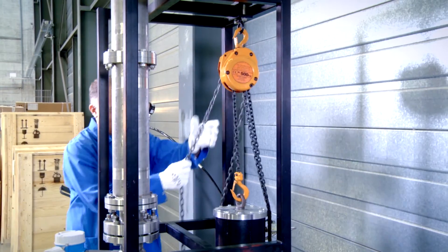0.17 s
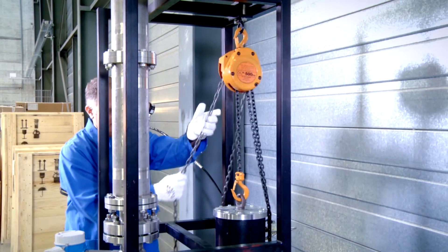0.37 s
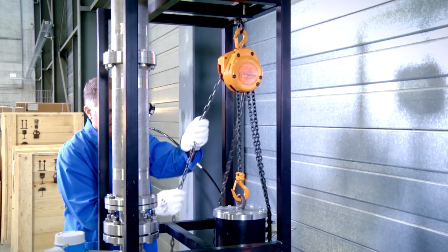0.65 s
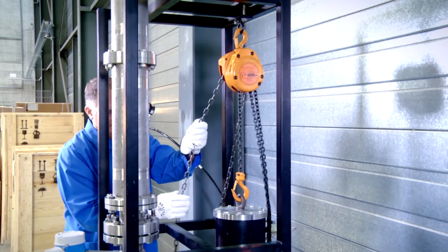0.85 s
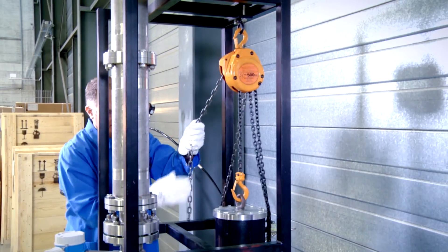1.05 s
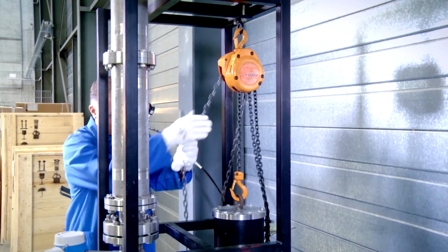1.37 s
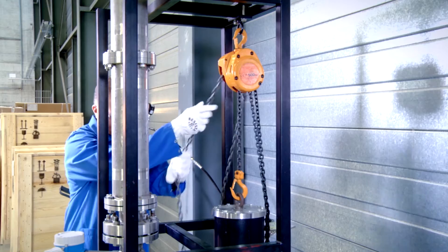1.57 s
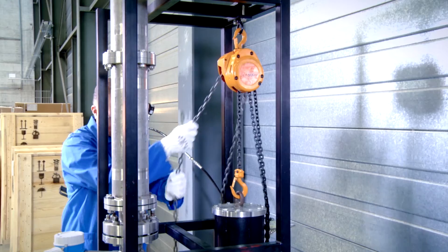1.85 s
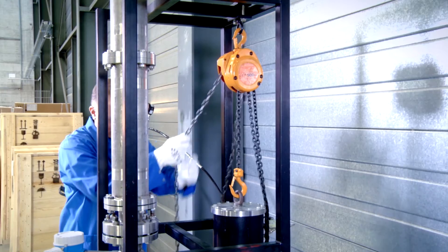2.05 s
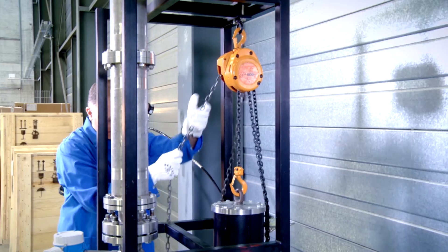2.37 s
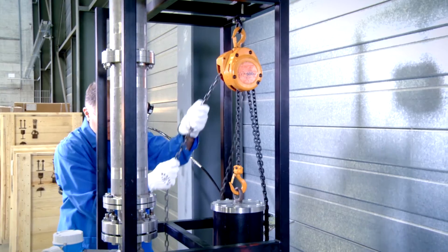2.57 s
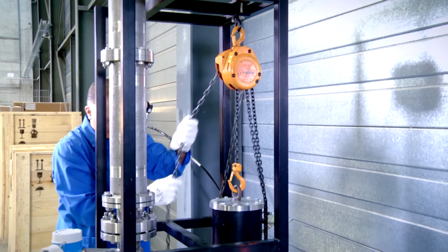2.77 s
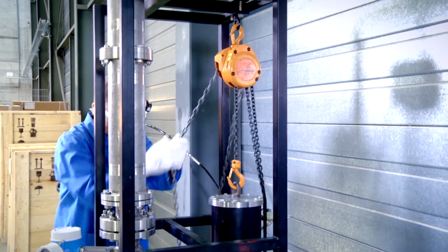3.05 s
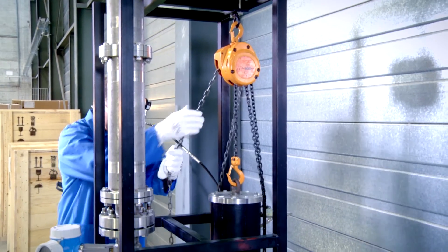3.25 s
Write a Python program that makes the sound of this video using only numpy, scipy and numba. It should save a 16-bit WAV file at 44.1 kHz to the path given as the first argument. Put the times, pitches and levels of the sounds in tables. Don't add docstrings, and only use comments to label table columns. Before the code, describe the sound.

A hand chain is pulled through a steel chain hoist. Until about 0.6 s, thin ticks run evenly, about 25 per second, over soft sliding links. A clunk lands near 0.7 s, then a brief lull. From 1.05 s, knock-and-clunk pairs follow every 0.15-0.2 s, with irregular ticks; after 1.8 s loose links jingle and a plate sings high. Rattling thickens near 2.8 s. Hall reverberation, faint ventilation hum.

```python
import sys
import numpy as np
from scipy import signal
from scipy.fft import rfft, irfft
from scipy.io import wavfile
from scipy.ndimage import uniform_filter1d
from numba import njit

SR = 44100
rng = np.random.default_rng(int(sys.argv[2]) if len(sys.argv) > 2 else 0)


def linear_from_db(decibels):
    return 10 ** (np.asarray(decibels, float) / 20)


def master(y):
    cut = np.clip(np.atleast_2d(y).T, -1, 1)
    pcm = np.round(cut * 32767)
    wavfile.write(sys.argv[1], SR, pcm.astype(np.int16))


N = 149940
LEAD = 17640
M = N + LEAD

# (time [s], peak level [dB])
SEATINGS = [(0.678, -22), (1.176, -20), (1.392, -17.5), (1.571, -16.5), (1.704, -18.5), (1.835, -20.5),
            (1.983, -19), (2.14, -18), (2.319, -22), (2.54, -23.5), (2.705, -18), (2.821, -17),
            (2.927, -26.5), (2.957, -19), (3.093, -18.5), (3.225, -20.5)]
# (time [s], peak level [dB])
SLIDES = [
    (-.16, -23.5),
    (0, -28.5),
    (.139, -30.5),
    (.148, -28.5),
    (.172, -35),
    (.298, -27.5),
    (.309, -26.5),
    (.337, -38),
    (.468, -24),
    (.48, -33),
]
# (time [s], peak level [dB])
EDGE_KNOCKS = [(0.1003, -37.5), (0.1176, -35.5), (0.2766, -43), (0.614, -37.5), (0.6425, -30.5),
               (0.6577, -34), (1.0483, -25), (1.1046, -48), (1.353, -25.5), (1.3608, -33), (1.438, -30.5),
               (1.5387, -24), (1.6705, -27.5), (1.8115, -22.5), (1.948, -22.5), (2.1076, -24),
               (2.27, -38.5), (2.277, -25.5), (2.49, -24.5), (2.6796, -23), (2.792, -28), (3.0668, -22),
               (3.192, -22), (3.3944, -25)]
# (time [s], peak level [dB])
EARLY_TICKS = [(0.013, -41.5), (0.057, -41.5), (0.097, -41.5), (0.139, -43), (0.1815, -44), (0.2176, -44),
               (0.2558, -42), (0.2927, -47), (0.3344, -40.5), (0.375, -48), (0.411, -45), (0.451, -43.5),
               (0.498, -43.5), (0.5472, -44.5), (0.605, -42.5), (0.6606, -40), (0.7334, -45.5),
               (0.7955, -46), (1.048, -42), (1.097, -41), (1.1772, -73), (1.2316, -43.5), (1.277, -42.5),
               (1.32, -42), (1.3544, -41), (1.3917, -37), (1.4451, -43), (1.4945, -41), (1.5394, -41),
               (1.5718, -38.5)]
LATE_TICKS = [(1.6102, -43), (1.6377, -43), (1.6713, -40.5), (1.703, -36), (1.7459, -42.5), (1.7735, -42),
              (2.04, -34), (2.1054, -36.5), (2.2034, -42.5), (2.2425, -43), (2.35, -45), (2.395, -42.5),
              (2.4368, -46), (2.4512, -43.5), (2.6035, -41), (2.681, -39), (2.917, -39), (3.039, -39.5),
              (3.073, -37), (3.1438, -40), (3.1944, -37), (3.2854, -46), (3.3324, -43), (3.3944, -32)]
# (time [s], peak level [dB])
LINK_STRIKES = [(0.2972, -38.5), (0.3374, -41), (0.3992, -42), (0.613, -41.5), (0.658, -38), (1.3542, -40),
                (1.3915, -49), (1.8085, -29), (1.839, -37), (1.944, -28), (1.979, -35.5), (2.1254, -31.5),
                (2.2698, -30), (2.483, -27), (2.629, -38), (2.641, -35.5), (2.704, -26), (2.76, -30),
                (2.818, -33), (2.944, -31), (3.089, -32), (3.2217, -36.5)]
# (time [s], peak level [dB])
PLATE_SLAPS = [(.247, -45), (1.091, -36.5), (1.345, -39), (1.5, -37), (1.81, -41), (1.86, -35),
               (1.965, -35), (2.127, -33.5), (2.27, -29), (2.436, -36), (2.5, -36.5), (2.71, -33.5),
               (2.82, -38), (2.95, -31), (3.09, -31.5), (3.215, -32.5), (3.29, -51), (.337, -45),
               (.62, -46)]
# (time [s], level [dB])
TENSION = [
    (0, -43.5),
    (.4, -36.5),
    (.75, -61),
    (.85, -54.5),
    (1.05, -61),
    (1.1, -45.5),
    (1.9, -46.5),
    (2.8, -35.5),
    (3.4, -42),
]
# (time [s], peak level [dB], frequency [Hz])
FAVOURED_MODES = [(0.0094, -31, 2240), (0.1156, -27, 3190), (0.1481, -24, 2150), (0.1714, -21.5, 2193),
                  (0.3087, -21.5, 2243), (0.3371, -21.5, 2165), (0.4718, -30, 2090), (0.614, -27, 4090),
                  (0.6424, -25, 3770), (0.6789, -24, 1949), (1.0505, -25, 3880), (1.1767, -27, 2270),
                  (1.3603, -23, 3670), (1.3932, -27.5, 2185), (1.5404, -26, 2620), (1.5718, -22, 2193),
                  (1.6721, -25, 2700), (1.7045, -26.5, 1910), (1.8362, -19.5, 2270), (1.9839, -24.5, 2270),
                  (2.1395, -22, 2130), (2.2772, -25, 3583), (2.3191, -24, 2260), (2.5396, -16.5, 2235),
                  (2.6798, -45, 3560), (2.7072, -20.5, 1880), (2.7926, -24, 2810), (2.82, -23.5, 2270),
                  (2.9262, -22.5, 2665), (2.9572, -17.5, 2210), (3.0679, -21.5, 2805), (3.0944, -24, 2260),
                  (3.1931, -21, 3640), (3.2266, -22.5, 2280)]
# (time [s], peak level [dB], frequency [Hz], t60 [s])
LONE_LINKS = [
    (.337, -44, 5430, 0.14),
    (.66, -56, 6045, 0.35),
    (.797, -41, 4780, 0.052),
    (1.95, -40, 5500, 0.17),
    (2.63, -43.5, 5998, 0.53),
    (2.485, -46, 7800, 0.18),
    (2.7, -42, 6800, .12),
    (2.95, -43, 5400, .15),
]

# (frequency [Hz], level [dB], t60 [s])
HOUSING_MODES = [(760.8, -13.5, 0.19), (927.3, -7.5, 0.066), (1005.4, -5.5, 0.071), (1488, -7.5, 0.17),
                 (1731, -0.5, 0.064), (1860, -17, 0.057), (1910, -19.5, 0.08), (2203, -9, 0.24),
                 (2270, -9.5, 0.22), (2665, 1.5, 0.037), (3184, -11.5, 0.17), (3800, -9, .12),
                 (4030, 3.5, 0.037), (4250, 2.5, 0.033)]
# (frequency [Hz], level [dB], t60 [s] where it differs from LINK_T60_S)
LINK_MODES = [(5445, -7, .15), (5998, -9, .25), (6750, -8), (7300, -8), (7860, -6), (8650, -6), (8877, -5),
              (9580, -8), (10550, -3, .13), (10760, -4), (11790, -9), (12500, -12), (13200, -5, .12),
              (15400, -15)]
LINK_T60_S = .09
# (frequency [Hz], level [dB], t60 [s])
PLATE_MODES = [(5033, -7, .45), (5089, -6, .5), (5156, 0, .55)]
# (frequency [Hz], level [dB], t60 [s])
STAND_MODES = [(268, -2.5, 0.46), (438, -7.5, 0.27), (547, 6, 0.13), (579, -6.5, 0.27)]
# (frequency [Hz], width [Hz], level [dB])
LINK_CROWDS = [(7380, 900, -9.5), (8770, 216, -7.5), (9640, 160, -13.5), (10640, 335, -5),
               (12040, 270, -20.5), (13030, 370, -13.5)]

# (frequency [Hz], level [dB])
SEATING_COLOUR = [(180, -89.5), (600, -20.5), (869, -5.5), (1270, -10), (2210, 0), (2970, -14.5),
                  (3670, -7.5), (4690, -22.5), (15000, -39.5)]
# (frequency [Hz], level [dB])
EDGE_COLOUR = [(180, -78), (620, -10.5), (898, -6.5), (1210, -6), (1730, -0.5), (3020, -1.5), (3670, 3),
               (4620, -13), (15000, -38.5)]
# (frequency [Hz], level [dB])
PAWL_COLOUR = [(1500, -16), (4000, 17), (7000, 13), (11000, 14.5), (15500, 9)]
# (frequency [Hz], density [dB per Hz])
VENTILATION_COLOUR = [(25, -12), (55, -8.5), (110, -8.5), (150, -3.5), (190, -4), (350, -1), (700, -6.5),
                      (16000, -41.5)]
# (frequency [Hz], t60 [s], level [dB])
HALL_DECAY = [(485, 2.57, 3), (2000, 1.45, 0), (4400, 1.58, 4.5), (6800, 0.44, 3), (12000, 0.51, 4.5)]
# (frequency [Hz], width [Hz], depth [0-1])
WALL_DIPS = [(1185, 151, 1), (2458, 136, 0.84)]


def clunks():
    t, db = np.array(SEATINGS).T
    slide_t, slide_db = np.array(SLIDES).T
    crack = burst(t, db + 9, 0.0001, 0.0028, 0.12, 2.5)
    crack = crack + burst(slide_t, slide_db + 5, 0.0015, 0.014, 0.13, 0.59)
    middle = ring(t, db - 13, HOUSING_MODES[3:11], 4.0, 0.0019, 0.013, 0.96)
    low = ring(t, db - 6.5, HOUSING_MODES[:3], 3.8, 0.0079, 0.028, 0.84)
    soft = ring(slide_t, slide_db - 13, HOUSING_MODES[:11], 2.7, 0.0098, 0.0069, 0.98)
    return colour(crack, SEATING_COLOUR) + middle + low + soft


def knocks():
    t, db = np.array(EDGE_KNOCKS).T
    crack = colour(burst(t, db + 5.5, 0.0006, 0.0081, 0.17, 1.07), EDGE_COLOUR)
    return crack + ring(t, db - 16, HOUSING_MODES[9:], 3, 0.0008, 0.0284, 0.84)


def pings():
    t, db, hz = np.array(FAVOURED_MODES).T
    link_t, link_db, link_hz, link_t60 = np.array(LONE_LINKS).T
    start = sample_index(np.r_[t, t, link_t])
    push = np.exp(-1 / (0.0011 * SR))
    gain = linear_from_db(np.r_[db - 7, db - 12, link_db]) * (1 - push) + 0j
    mate_hz = hz * (1 + 0.012 * rng.standard_normal(len(t)))
    t60 = 160 / hz
    rough = 1 + 0.42 * rng.standard_normal(M)
    lone = decay(start, np.r_[hz, mate_hz, link_hz], np.r_[t60, t60, link_t60], gain, push, rough)
    slap_t, slap_db = np.array(PLATE_SLAPS).T
    blow_t, blow_db = np.array(SEATINGS[1:]).T
    stand = ring(slap_t, slap_db - 25, STAND_MODES[:1], 2.4, 0.0021, 0.011, 0.74)
    stand = stand + ring(blow_t, blow_db - 37, STAND_MODES[1:], 6.3, 0.0015, 0.0078, 0.84)
    return lone + stand


def jingles():
    t, db = np.array(LINK_STRIKES).T
    rebound_s = 0.019
    t, db = np.r_[t, t + rebound_s], np.r_[db, db - 3.5]
    links = ring(t, db - 17.5, LINK_MODES, 1.7, 0.0041, 0.0017, 0.85)
    unlike_links = ring(t, db - 9.5, LINK_MODES, 3.7, 0.0056, .03, 0.9)
    scrape = colour(burst(t, db - 4, 0.0014, 0.0094, 0.36, 2), PAWL_COLOUR)
    slap_t, slap_db = np.array(PLATE_SLAPS).T
    plate = ring(slap_t, slap_db - 8.5, PLATE_MODES, 0.6, 0.00078, 0, 0.91)
    return links + unlike_links + banded(scrape, -10) + plate


def pawl():
    t, db = np.array(EARLY_TICKS + LATE_TICKS).T
    tick = colour(burst(t, db + 2, 0.00034, 0.0079, 0.099, 1.4), PAWL_COLOUR)
    return banded(tick, -3) + ring(t, db - 19, LINK_MODES, 5.9, 0.003, 0.024, 0.44)


def rattle():
    contacts_per_s, spread_db = 300, 10.5
    chance = rng.random((int(contacts_per_s * M / SR), 2))
    t = (chance[:, 0] * M - LEAD) / SR
    db = np.interp(t, *np.array(TENSION).T) + spread_db * chance[:, 1] ** 2
    housing = ring(t, db - 17.5, HOUSING_MODES, 2.7, 0.00049, 0.0298, 0.33)
    links = ring(t, db - 26, LINK_MODES, 3.2, 0.00033, 0.025, 0.28)
    return housing + links + colour(burst(t, db - 3, 0.00034, 0.0007, 0.037, 2.9), EDGE_COLOUR)


def sample_index(times):
    return np.clip((np.asarray(times) * SR).astype(int) + LEAD, 0, M - 1)


def burst(times, db, rise_s, hold_s, t60_s, grain_db):
    t = np.arange(int(.15 * SR)) / SR
    grit = rng.standard_normal(M) * linear_from_db(grain_db * rng.standard_normal(M))
    shape = np.minimum(t / rise_s, 1) * linear_from_db(-60 * np.maximum(t - hold_s, 0) / t60_s)
    clicks = np.bincount(sample_index(times), linear_from_db(db), M)
    return signal.fftconvolve(clicks, shape)[:M] * grit / grit.std()


def ring(times, db, modes, scatter_db, push_s, detune, share):
    hz, mode_db, t60 = np.array([(*m, LINK_T60_S)[:3] for m in modes], float).T
    size = (len(times), len(modes))
    scatter, shift = rng.standard_normal((2, *size))
    on = rng.random(size) < share
    phase = np.exp(2j * np.pi * rng.random(size))
    start = np.broadcast_to(sample_index(times)[:, None], size)
    push = np.exp(-1 / (push_s * SR))
    gain = linear_from_db(db[:, None] + mode_db + scatter_db * scatter) * (1 - push) * phase
    mode_hz = hz * (1 + detune * shift)
    mode_t60 = np.broadcast_to(t60, size)
    rough = 1 + 2.5 * rng.standard_normal(M)
    return decay(start[on], mode_hz[on], mode_t60[on], gain[on], push, rough)


@njit
def decay(start, hz, t60, gain, push, noise):
    out = np.zeros(len(noise))
    for k in range(len(hz)):
        turn = np.exp(2j * np.pi * hz[k] / SR)
        pole = turn * np.exp(-np.log(1000) / (t60[k] * SR))
        z, drive = 0j, gain[k]
        for i in range(start[k], min(start[k] + int(t60[k] * SR), len(noise))):
            z = z * pole + drive * noise[i]
            drive *= push * turn
            out[i] += z.imag
    return out


def banded(x, dry_db):
    out = linear_from_db(dry_db) * x
    for hz, width, db in LINK_CROWDS:
        out = out + linear_from_db(db) * signal.lfilter(*signal.iirpeak(hz, hz / width, SR), x)
    return out


def colour(x, table):
    hz, db = np.array(table, float).T
    f = np.maximum(np.arange(1025) * SR / 2048, 10)
    log_gain = np.interp(np.log(f), np.log(hz), db - db.max()) * np.log(10) / 20
    cepstrum = irfft(log_gain)
    cepstrum[1:1024] *= 2
    cepstrum[1025:] = 0
    return signal.fftconvolve(x, irfft(np.exp(rfft(cepstrum))))[:len(x)]


def hall(x):
    level_db, gap_s = -7, 0.0092
    t = np.arange(int(1.2 * SR)) / SR
    hz, t60, db = np.array(HALL_DECAY).T
    tail = np.zeros(len(t))
    for f in 150 * 2 ** np.arange(0, 6.8, .5):
        sos = signal.butter(2, [f / 1.19, f * 1.19], "band", fs=SR, output="sos")
        band = signal.sosfilt(sos, rng.standard_normal(len(t)))
        band_db = np.interp(np.log(f), np.log(hz), db)
        band_t60 = np.interp(np.log(f), np.log(hz), t60)
        tail += band * linear_from_db(band_db - 60 * t / band_t60)
    tail *= np.clip(t / gap_s, 0, 1) ** 2
    return signal.fftconvolve(x, tail * linear_from_db(level_db) / 60)[:M]


def hum():
    air = colour(rng.standard_normal(M), VENTILATION_COLOUR)
    waver = uniform_filter1d(rng.standard_normal(M), size=4000) * 60
    tone_hz, tone_db = 147, -76.5
    tone = linear_from_db(tone_db + 1.7 * waver) * np.sin(2 * np.pi * tone_hz * np.arange(M) / SR)
    return air / air.std() * linear_from_db(-67.5) + tone


def scene():
    hoist = clunks() + knocks() + pings() + jingles() + pawl() + rattle()
    hoist = signal.sosfilt(signal.butter(2, 300, "high", fs=SR, output="sos"), hoist)
    heard = hoist + hall(hoist)
    for hz, width, depth in WALL_DIPS:
        heard = heard - depth * signal.lfilter(*signal.iirpeak(hz, hz / width, SR), heard)
    return (heard + hum())[None, LEAD:]


def roll_off(x):
    return signal.sosfilt(signal.butter(12, 16540, fs=SR, output="sos"), x)


def record(dry):
    top_hz = 15620
    mix = signal.sosfilt(signal.ellip(10, .3, 60, top_hz, fs=SR, output="sos"), dry)
    return roll_off(mix)


dry = scene()
out = record(dry)
master(out)
```